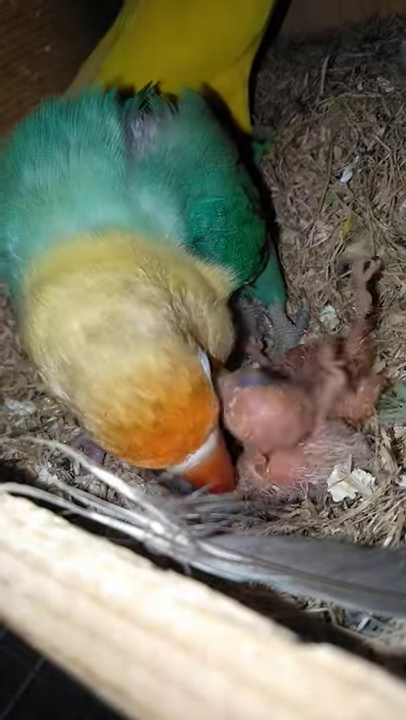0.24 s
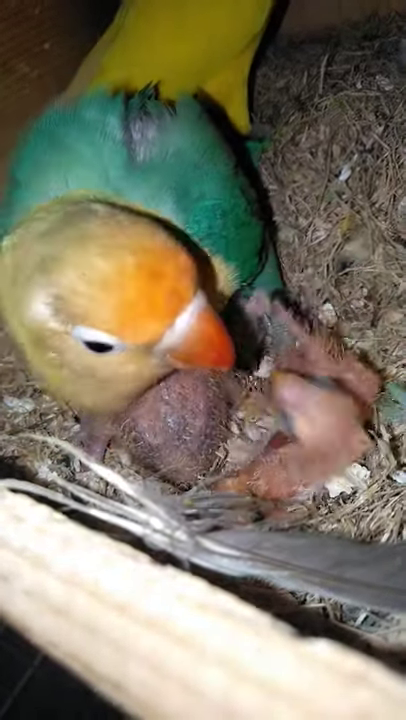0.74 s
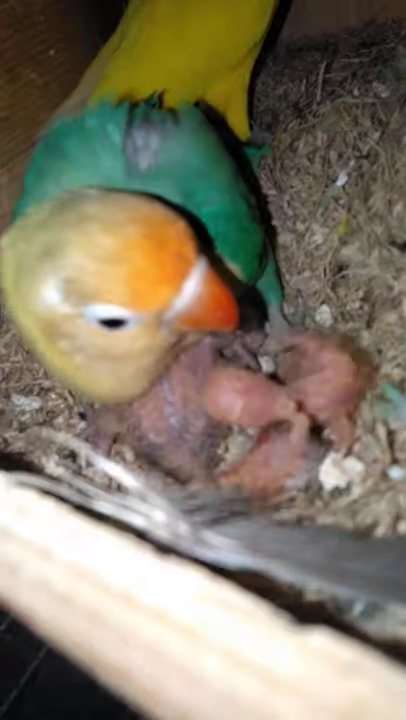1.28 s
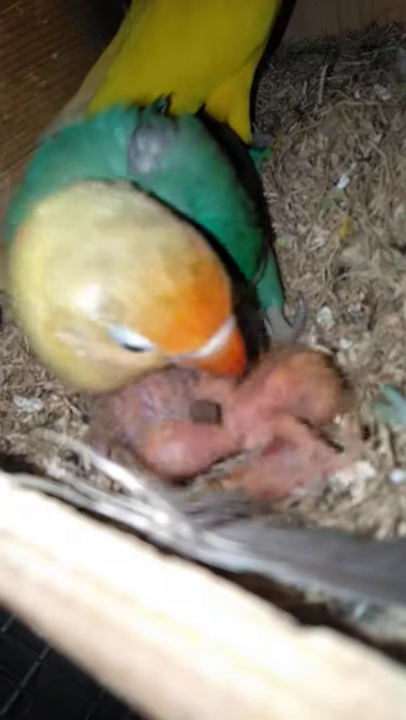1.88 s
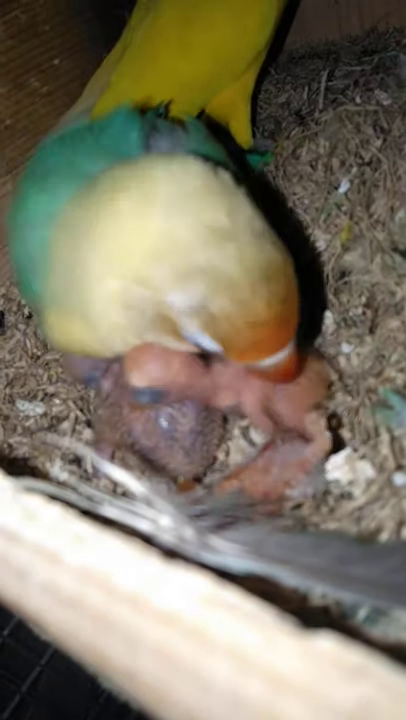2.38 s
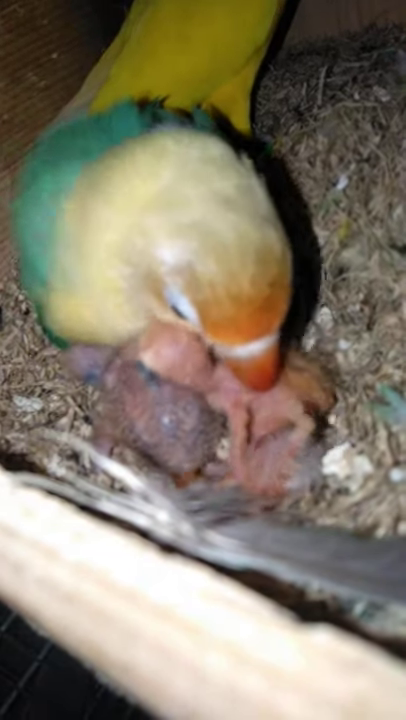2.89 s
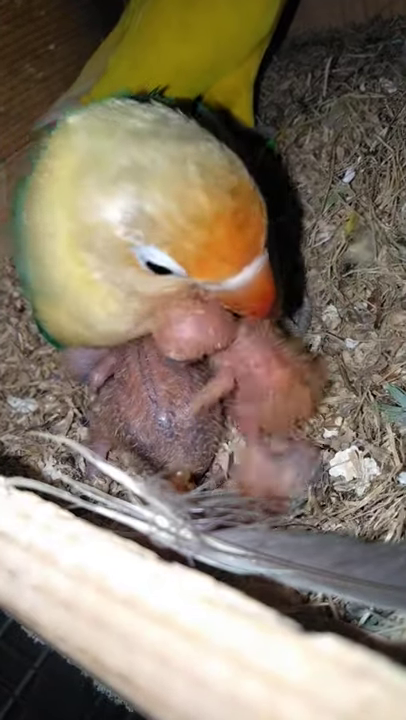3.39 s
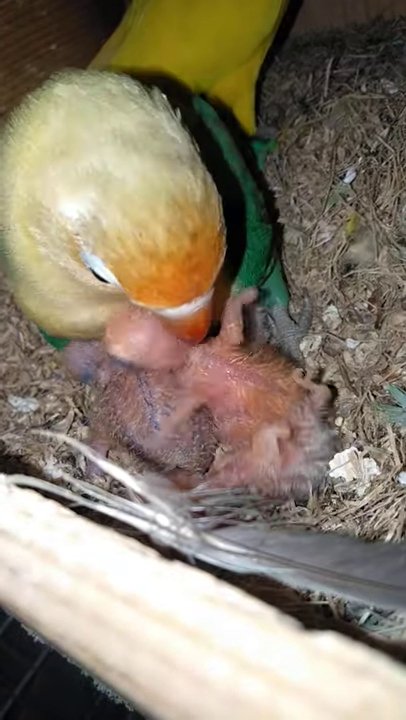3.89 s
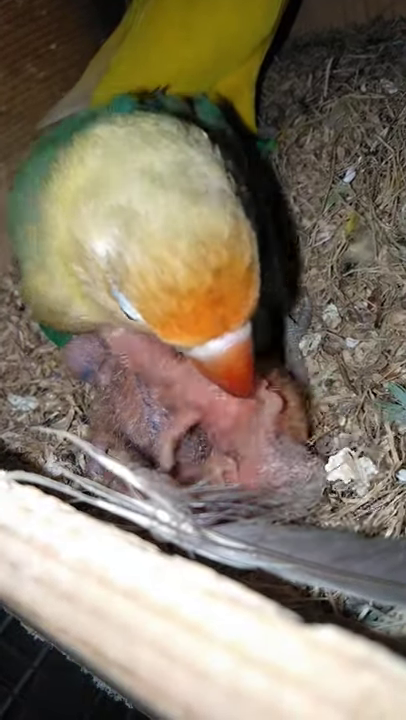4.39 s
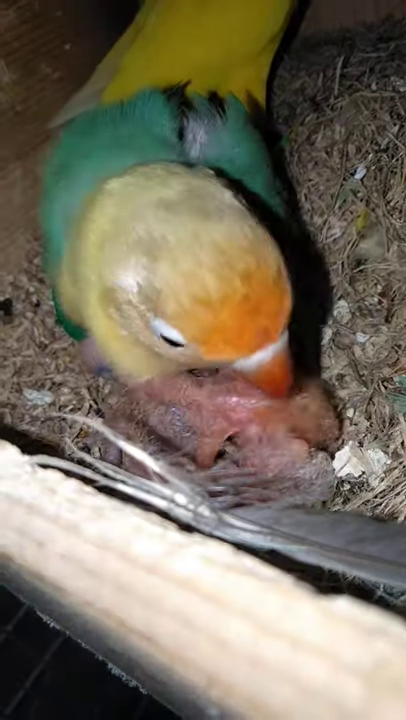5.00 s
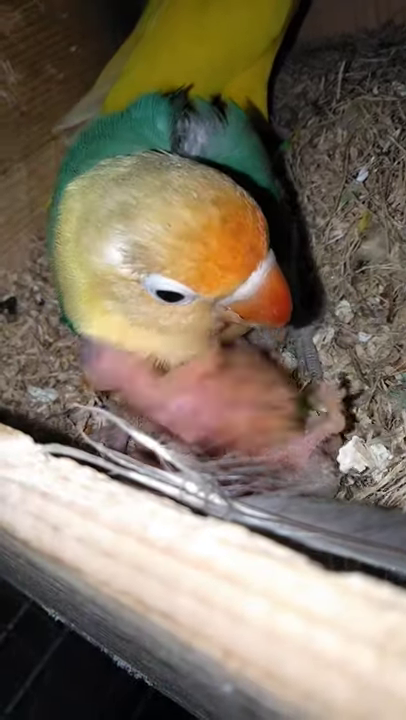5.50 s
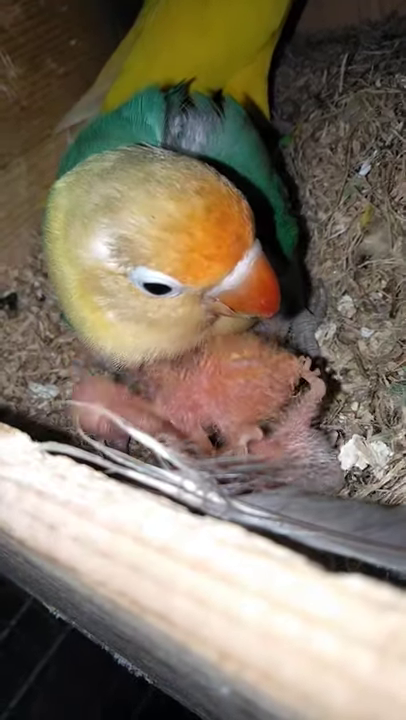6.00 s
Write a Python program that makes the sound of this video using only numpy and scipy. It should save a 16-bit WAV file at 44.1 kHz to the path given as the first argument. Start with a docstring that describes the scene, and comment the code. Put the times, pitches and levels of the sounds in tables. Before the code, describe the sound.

Close in a small wooden nest box, two hatchlings beg in turn: one with brief rough rising peeps, the other with louder, very short clicky yips, each under a tenth of a second. A low soft rumble and slight hiss lie beneath. From about 2.5 seconds a rooster crows hoarsely across the yard for two seconds, then soft rubs on wood and faint far whistles follow.

```python
"""A hatchling peeps over low rumble and hiss; a second in the same wooden nest box answers in short yips.
Both voices are half-pitch partial series roughened into noise, break upward and echo off the box walls.
From 2.5 s a rooster crows across the yard: wavering lines over a hoarse rasp, low notes first and last.
Feet and litter rub the wood in enveloped noise bursts; faint far whistles are single rough partials."""
import sys
import numpy as np
from scipy import signal
from scipy.fft import rfft, irfft, next_fast_len
from scipy.io import wavfile
from scipy.ndimage import map_coordinates

SR = 44100
rng = np.random.default_rng(int(sys.argv[2]) if len(sys.argv) > 2 else 0)


def materialize(psi):
    """Save the field psi as 16-bit PCM at rate SR to the path in sys.argv[1].

    A 1-D psi becomes a single channel; in a 2-D psi each row is a channel.
    """
    bounded = np.clip(np.atleast_2d(psi).T, -1, 1)
    quanta = np.round(bounded * 32767).astype(np.int16)
    wavfile.write(sys.argv[1], SR, quanta)


def linear_from_db(decibels):
    """Turn decibels (scalar or array-like) into linear amplitude factors; 0 gives 1."""
    return 10 ** (np.asarray(decibels, float) / 20)


N = 275622


def unit(x):
    """x at rms 1."""
    return x / np.sqrt(np.mean(np.abs(x) ** 2) + 1e-20)


def along(points, hz):
    """Interpolates (frequency [Hz], value) points on a log frequency axis."""
    f, v = np.transpose(points)
    return np.interp(np.log(hz + 1), np.log(f + 1), v)


def span(rows):
    """First sample, then one value per sample for each column while the rows last."""
    s, *cols = np.transpose(rows)
    start = max(round(s[0] * SR), 0)
    end = min(round(s[-1] * SR), N)
    t = np.arange(start, end) / SR
    return start, [np.interp(t, s, c) for c in cols]


def wobble(size, rate_hz):
    """A smooth random curve, rate_hz knots a second."""
    knots = rng.standard_normal(size // 8 + 8)
    return map_coordinates(knots, [np.arange(size) * rate_hz / SR])


def filtered(x, response):
    """x times a complex response of frequency [Hz]."""
    m = next_fast_len(len(x) + SR // 4)
    return irfft(rfft(x, m) * response(np.fft.rfftfreq(m, 1 / SR)), m)[:len(x)]


def add(track, start, sound):
    """Mixes a sound into the track."""
    track[start:start + len(sound)] += sound


def voice(hz, gains, rough, jitter, smear_hz, count):
    """Partials at every half of the pitch; roughness trades each line for a smear of noise, more so up high."""
    size = len(hz)
    phase = np.pi * np.cumsum(hz * (1 + jitter * wobble(size, smear_hz))) / SR  # of the half pitch
    out = np.zeros(size)
    for k in range(1, count + 1):
        share = 1 - (1 - np.clip(rough, 0, 1)) ** (k / 4) ** 1.2
        flutter = wobble(size, smear_hz) + 1j * wobble(size, smear_hz)
        line = np.sqrt(2 - 2 * share ** 2) + share * flutter
        turn = np.exp(1j * (k * phase + 2 * np.pi * rng.random()))
        out += gains(k) * np.real(line * turn)
    return out


def answer(x, t60s, delay_s):
    """Reverberation: each frequency dies at its own speed; a fresh random tail every 1/8 s."""
    out, step = np.zeros(N + 2 * SR), SR // 8
    for start in range(0, N, step):
        hz, t, z = signal.stft(rng.standard_normal(SR // 2), SR, nperseg=256)
        decay = linear_from_db(-60 * t / along(t60s, hz)[:, None])
        tail = signal.istft(z * decay, SR, nperseg=256)[1]
        wet = signal.fftconvolve(x[start:start + step], tail / np.linalg.norm(tail))
        add(out, start + round(delay_s * SR), wet)
    return out[:N]


# yard decay: (frequency [Hz], t60 [s])
YARD_T60 = [(600, 0.16), (2000, 0.73), (6000, 0.46)]


def yard_echo(x):
    """Echo of the yard, longest around 2 kHz."""
    return answer(x, YARD_T60, delay_s=0.018)


# decay around the box: (frequency [Hz], t60 [s])
SHED_T60 = [(600, 0.23), (2000, 0.4), (7000, .3), (12000, 0.37)]


def shed_echo(x):
    """Short echo of the shed around the box."""
    return answer(x, SHED_T60, delay_s=.006)


# rumble spectrum shape: (frequency [Hz], relative density [dB per Hz])
RUMBLE_SPECTRUM = [(12, -43), (20, -31), (30, -18.5), (43, -11), (54, -3), (87, -4), (107, -0.5), (124, 3),
                   (143, -4.5), (167, -11.5), (198, -9.5), (248, -20.5), (375, -44), (600, -42),
                   (780, -62.5), (1320, -120)]
# hiss spectrum shape: (frequency [Hz], relative density [dB per Hz])
HISS_SPECTRUM = [(180, -40.5), (300, -8.5), (378, -4.5), (446, -8.5), (591, -16), (663, -10.5),
                 (1050, -11.5), (1910, -15.5), (2530, -17), (15600, -23)]
RUMBLE_DB, HISS_DB = -47.5, -76.0


def background():
    """Far traffic-like rumble that heaves a little, and smooth microphone hiss: two shaped noises."""
    heave = linear_from_db(RUMBLE_DB + .4 * wobble(N, 1) + 1.5 * wobble(N, 6))
    rumble = unit(filtered(rng.standard_normal(N), lambda f: linear_from_db(along(RUMBLE_SPECTRUM, f))))
    hiss = unit(filtered(rng.standard_normal(N), lambda f: linear_from_db(along(HISS_SPECTRUM, f))))
    return heave * rumble + linear_from_db(HISS_DB) * hiss


# faint far whistles, fades excluded:
# (start [s], length [s], first pitch [Hz], last pitch [Hz], level [dB], roughness [0-1])
FAR_WHISTLES = [(4.551, 0.27, 1810, 1730, -75, 0.86), (5.001, .04, 1645, 1670, -67.5, 0.73),
                (5.12, 0.06, 1720, 1690, -74.5, 1), (5.16, .11, 1960, 2020, -83, .65),
                (5.2, .08, 4600, 4450, -85, 1), (5.26, 0.077, 1720, 1800, -71.5, 0.99),
                (5.51, 0.21, 1760, 1750, -68.5, 1), (5.67, .06, 5300, 5250, -81, .8),
                (5.741, 1, 2108, 2060, -74, 0.62), (6.032, 0.051, 1576, 1578, -76, 0.87)]
FADE_S, FADE_DB = 0.045, -16  # in and out


def far_fowl():
    """Only the strongest partial of distant calls carries, breaking up on its way."""
    out = np.zeros(N)
    for s, length, first_hz, last_hz, level_db, rough in FAR_WHISTLES:
        end = s + length
        start, (hz, db) = span([(s - FADE_S, first_hz, level_db + FADE_DB),
                                (s, first_hz, level_db),
                                (end, last_hz, level_db),
                                (end + FADE_S, last_hz, level_db + FADE_DB)])
        gains = lambda k: (k == 2) * linear_from_db(db)
        add(out, start, voice(hz, gains, rough, jitter=.006, smear_hz=140, count=2))
    return out


# rubs on the box: (start [s], length [s], level [dB], centre [Hz], half-width at 1/e [Hz])
RUBS = [(3.31, 0.056, -59.5, 455, 120), (5.26, 0.059, -56.5, 324, 65), (5.505, 0.098, -50.5, 366, 300),
        (5.55, 0.08, -48.5, 240, 81), (5.5, 0.14, -68, 1330, 490), (5.65, 0.028, -66, 630, 40),
        (4.568, 0.0037, -54, 4130, 740)]
SCRAPE_DB = 3  # uneven catching


def shuffles():
    """Short rubs of feet and litter on wood: band noise, quick to start and dying away."""
    out, t = np.zeros(N), np.arange(SR // 4) / SR
    for s, length, db, hz, width in RUBS:
        rub = filtered(rng.standard_normal(len(t)), lambda f: np.exp(-((f - hz) / width) ** 2))
        level = linear_from_db(db + SCRAPE_DB * wobble(len(t), 90))
        envelope = t / length * 4 * np.exp(1 - t / length * 4)  # peaks at length / 4
        add(out, round(s * SR), level * unit(rub) * envelope)
    return out


def rasp(hz, modes):
    """Lumpy breath noise, gated once a cycle; each steep resonance swells and fades on its own."""
    gate = 1 + 0.9 * np.cos(2 * np.pi * np.cumsum(hz) / SR)
    out = np.zeros(len(hz))
    for c, w, db in modes:
        lumps = linear_from_db(db + 3 * wobble(len(hz), 70))
        breath = gate * lumps * rng.standard_normal(len(hz))
        out += filtered(breath, lambda f: (1j * f * w / (c * c - f * f + 1j * f * w)) ** 3)
    return unit(out)


# high register, levels before the mix gain: (time [s], pitch [Hz], first partial [dB],
# upper partials' reference [dB], chest rasp [dB], throat rasp [dB])
CROW_TRACK = [(2.47, 723, -90, -97, -89, -80), (2.5, 713.7, -90, -90, -73, -58),
              (2.55, 715, -92, -88, -45.5, -48.5), (2.66, 720, -90, -88, -57, -55.5),
              (2.739, 741.7, -80, -86, -65, -79), (2.746, 774.5, -45.5, -63, -57.5, -50),
              (2.765, 862, -41, -54, -55, -71), (2.81, 864, -40, -40, -57, -66),
              (2.845, 870.3, -42, -53, -55, -48), (2.87, 856.2, -71, -76, -54.5, -49),
              (2.94, 857, -64, -59, -64, -50), (2.955, 771.6, -48.5, -73.5, -42.5, -48.5),
              (3.0, 858.7, -44, -56.5, -43, -45.5), (3.11, 861.4, -44.5, -52, -45.5, -45.5),
              (3.13, 877.8, -38, -46, -52, -49), (3.32, 861.4, -43, -45, -51.5, -48.5),
              (3.4, 876, -36.5, -47.5, -54.5, -50), (3.455, 866.4, -46, -48, -48, -47.5),
              (3.475, 726.4, -55.5, -64, -43.5, -47), (3.52, 752, -43, -75, -49, -46.5),
              (3.55, 836.6, -51.5, -52, -50.5, -60), (3.68, 832.6, -48, -48.5, -56.5, -55.5),
              (3.8, 840, -48, -54, -62, -55.5), (3.92, 826, -48.5, -54, -67, -57.5),
              (4.08, 817, -53.5, -49, -63, -53), (4.15, 801.4, -53, -58.5, -66, -64),
              (4.22, 748.6, -46, -58.5, -55, -55), (4.25, 687.4, -61, -73, -66, -69),
              (4.32, 674, -86, -90, -74, -78)]
# throat above the first partial: (frequency [Hz], gain [dB])
HIGH_THROAT = [(1150, -42.5), (1300, -0.5), (1700, 7.5), (2080, 12), (2550, -17.5), (2900, 1),
               (3450, -52.5), (4300, -54), (5050, -52.5), (5210, -33.5), (5400, -24), (5650, -11.5),
               (5790, -54), (6100, -54.5), (6700, -48.5), (6940, -39), (7200, -51), (7470, -29.5),
               (7750, -71)]
# half-pitch lines: (time [s], share [0-1])
HALF_PITCH_SHARE = [(2.82, 0.04), (2.94, 0.42), (3.2, 0.13), (3.6, 0.07), (3.85, .25), (4.2, 0.02)]
# rasp resonances, each cubed: (centre [Hz], width before cubing [Hz], relative drive [dB])
CHEST_MODES = [(773.7, 149, 1), (1224, 154, -14.5)]
THROAT_MODES = [(1463, 280, 5), (1750, 204, 13), (2000, 284, 8.5), (2483, 170, -1.5), (2916, 400, -5.5)]
WAVER_DB = .8


def crow_high():
    """Clear wavering lines, with weaker ones at half pitch, over a hoarse chest and throat rasp."""
    out = np.zeros(N)
    start, (hz, first_db, upper_db, chest_db, throat_db) = span(CROW_TRACK)
    t = (start + np.arange(len(hz))) / SR
    half = np.clip(np.interp(t, *np.transpose(HALF_PITCH_SHARE)), 0, 1)
    first_db = first_db + WAVER_DB * wobble(len(hz), 14)
    upper_db = upper_db + WAVER_DB * wobble(len(hz), 14)

    def gains(k):
        """Odd k are the half-pitch lines."""
        if k == 2:
            return linear_from_db(first_db)
        return (k > 2) * linear_from_db(upper_db + along(HIGH_THROAT, k * hz / 2)) * (half if k % 2 else 1)

    lines = voice(hz, gains, rough=.3, jitter=.003, smear_hz=60, count=18)
    hoarse = linear_from_db(chest_db) * rasp(hz, CHEST_MODES) + linear_from_db(throat_db) * rasp(hz, THROAT_MODES)
    add(out, start, lines + hoarse)
    return out


# low register, opening and closing notes, levels before the mix gain:
# (time [s], pitch [Hz], level [dB], roughness [0-1])
LOW_TRACKS = [
    [(2.472, 585, -92, 0.16), (2.482, 585, -68, .2), (2.5, 585, -62.5, .3), (2.505, 660, -59, 0.1),
     (2.54, 680, -54.5, 0.98), (2.58, 680, -58.5, 0.65), (2.6, 593, -55.5, 0.2), (2.68, 585, -66, 0.97),
     (2.76, 580, -55.5, 0.36), (2.77, 590, -81, 0.26)],
    [(4.225, 614, -87, 0.31), (4.245, 614, -57.5, 0.4), (4.29, 609.5, -64, 0.3), (4.35, 603, -75, 0.4),
     (4.365, 602, -52.5, 0.2), (4.42, 592, -55.5, 0.2), (4.49, 567, -59, 0.3), (4.52, 563, -83, 0.74),
     (4.6, 570, -83, .8)],
]
# first partial over the note's level, by pitch: (pitch [Hz], gain [dB])
LOW_FIRST_GAIN = [(565, -24), (615, -4), (680, 6.5)]
# throat in the low register: (frequency [Hz], gain [dB])
LOW_THROAT = [(1200, -3), (1800, 10.5), (2400, -14.5), (3000, -53)]


def crow_low():
    """Opening and closing notes: rough whole-pitch partials only."""
    out = np.zeros(N)
    for rows in LOW_TRACKS:
        start, (hz, db, rough) = span(rows)

        def gains(k):
            """Odd k (half pitch) are silent."""
            if k == 2:
                return linear_from_db(db + along(LOW_FIRST_GAIN, hz))
            return (1 - k % 2) * linear_from_db(db + along(LOW_THROAT, k * hz / 2))

        add(out, start, voice(hz, gains, rough, jitter=0.0059, smear_hz=110.8, count=10))
    return out


def rooster():
    """Both registers of the crow."""
    return crow_high() + crow_low()


ATTACK_S, RELEASE_S, SILENT_DB = .004, .007, -30
SWELL_SHARE, SNAP_S = .5, .001  # swell point on the way to the break; half the break's duration


def call(row, shape, break_hz):
    """One begging call: it swells on its pitch, may glide, breaks into the upper voice and stops short."""
    s, snap, length, db, hz = row[:5]
    last_hz = row[-4]  # just before the break; the same as hz in a yip
    times = s + np.array([0, SWELL_SHARE * snap, snap - SNAP_S, snap + SNAP_S, length])
    pitches = (hz, hz, last_hz, *break_hz)
    body = [(t, pitch, db + gain_db, rough)
            for t, pitch, (gain_db, rough) in zip(times, pitches, shape)]
    edge = lambda p, dt: (p[0] + dt, p[1], p[2] + SILENT_DB, p[3])
    return [edge(body[0], -ATTACK_S), *body, edge(body[-1], RELEASE_S)]


LEAST_ROUGH, AIR_DB = .2, -9  # membranes never run clean; escaping air re voice


def hatchling(calls, shape, break_hz, throat):
    """A rough membrane also slips into half pitch; the tiny throat passes little below its first resonance."""
    out = np.zeros(N)
    order = np.arange(1, 33)[:, None]
    for row in calls:
        start, (hz, db, rough) = span(call(row, shape, break_hz))
        gape = [(1800, row[-3]), (3500, 0), (5200, row[-2]), (7000, row[-1])]  # (Hz, dB)
        tract = lambda f: linear_from_db(along(throat, f) + along(gape, f))
        partial_hz = order * hz / 2
        half_pitch = np.where(order % 2, np.clip(rough, 0, 1) ** 2, 1)
        gain = tract(partial_hz) * half_pitch * (partial_hz < SR * .35)
        gain = gain / np.sqrt(np.sum(gain ** 2, axis=0))
        tone = voice(hz, lambda k: gain[k - 1], np.maximum(rough, LEAST_ROUGH),
                     jitter=.02, smear_hz=600, count=32)
        add(out, start, linear_from_db(db) * tone)
        puffs = 1 + np.cos(2 * np.pi * np.cumsum(hz) / SR)  # breath escapes once a cycle
        air = rng.standard_normal(len(hz)) * puffs
        air = filtered(air, lambda f: tract(f) / (1 + (2300 / (f + 1)) ** 8))
        add(out, start, linear_from_db(db + AIR_DB) * unit(air))
    return filtered(out, lambda f: 1 / (1 + (1150 / (f + 1)) ** 12))


# short yips: (start [s], break after [s], length [s], level [dB], pitch up to the break [Hz],
# gape at 1.8 kHz [dB], at 5.2 kHz [dB], above 7 kHz [dB])
YIP_CALLS = [(.487, .013, .024, -45, 1035, 5, 8, 1.5), (1.026, .018, 0.026, -43, 931, 4.5, 7, 1.5),
             (1.607, 0.017, 0.025, -41.5, 1046, 11, -2, 11.5),
             (2.172, 0.017, 0.022, -40.5, 1032, 10.5, -2, 4),
             (2.874, 0.022, 0.027, -39.5, 1222, 5, -0.5, -8),
             (3.470, 0.015, 0.017, -58.5, 1026, -5, -8, -14), (4.846, .012, 0.02, -41.5, 1000, -3, 2, -7),
             (6.197, .011, .021, -45, 1020, 7.5, 8, -1.5)]
# onset, swell, just before the break, just after, last moment: (gain [dB], roughness [0-1])
YIP_COURSE = [(-11, 0.44), (-12, 0.8), (-3, 0.64), (-2.5, 0.74), (0, 0.74)]
# throat: (frequency [Hz], relative gain [dB])
YIP_TRACT = [(1000, -16.5), (1350, 3.5), (1600, 0), (2600, -4.5), (3400, -0.5), (4400, -5.5), (5200, -4),
             (6000, -3), (7000, -5.5), (8000, -21.5), (10000, -23.5), (14000, -34)]


def yipping_hatchling():
    """Short yips, level in pitch, then an upper voice rising 1400-1730 Hz."""
    return hatchling(YIP_CALLS, YIP_COURSE, (1400, 1730), YIP_TRACT)


# longer peeps: (start [s], break after [s], length [s], level [dB], pitch [Hz],
# pitch just before the break [Hz], gape at 1.8 kHz [dB], at 5.2 kHz [dB], above 7 kHz [dB])
PEEP_CALLS = [(.119, 0.053, 0.064, -51, 1006, 1224, 2.5, 5, 4),
              (.918, 0.05, 0.074, -49.5, 973, 1190, -11.5, 8, -3.5),
              (1.728, 0.052, 0.072, -49.5, 974, 1220, -7.5, 7, -2),
              (2.522, 0.042, 0.073, -50.5, 1170, 1400, -0.5, 12.5, 1),
              (3.278, 0.054, 0.082, -48.5, 1110, 1353, -1.5, 10, 1),
              (4.062, .046, 0.082, -52, 1144, 1276, -5.5, 2.5, 2.5),
              (4.150, .047, 0.091, -56.5, 1002, 957, -7.5, -26, -2.5),
              (4.803, 0.047, 0.078, -51.5, 940, 966.5, -1.5, -6, 0.5),
              (5.550, 0.043, 0.077, -52.5, 868, 914, -2, 8.5, 0)]
# onset, swell, just before the break, just after, last moment: (gain [dB], roughness [0-1])
PEEP_COURSE = [(-10, 0.3), (-3, 0.3), (-3, 0), (0, 0.91), (-2, 1)]
# throat: (frequency [Hz], relative gain [dB])
PEEP_TRACT = [(1000, -55), (1350, 4), (2000, 4.5), (2600, -2), (3500, 4.5), (4400, -12), (5000, -13.5),
              (6000, -12), (7000, -7), (8000, -16.5), (10000, -23.5), (13000, -39)]


def peeping_hatchling():
    """Longer peeps, mostly rising, then an upper voice sinking 1460-1417 Hz."""
    return hatchling(PEEP_CALLS, PEEP_COURSE, (1460, 1417), PEEP_TRACT)


# first echoes off the close wooden walls: (delay [ms], level [dB])
WALL_ECHOES = [(0.834, -21), (1.901, -19), (3.101, -13.5)]


def box(x):
    """Close walls comb the sound into fixed bands."""
    echo = lambda f, ms, db: linear_from_db(db) * np.exp(-2j * np.pi * f * ms / 1000)
    return filtered(x, lambda f: 1 + sum(echo(f, ms, db) for ms, db in WALL_ECHOES))


def scene():
    """The nest is near, the yard far and wet."""
    distance = far_fowl() + background()
    crow = rooster()
    yard = linear_from_db(-4.5) * crow + linear_from_db(-12.0) * yard_echo(crow)
    nest = box(peeping_hatchling() + yipping_hatchling()) + shuffles()
    near = nest + linear_from_db(-13) * shed_echo(nest)
    return (near + yard + distance)[None]


def roll_off(x):
    """The treble ends steeply here."""
    return signal.sosfilt(signal.butter(12, 15710, fs=SR, output="sos"), x)


def record(dry):
    """Turns the finished mix into the final output."""
    return roll_off(dry)


dry = scene()
out = record(dry)
materialize(out)
```